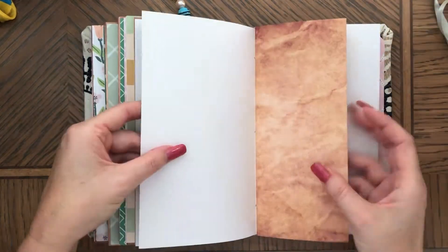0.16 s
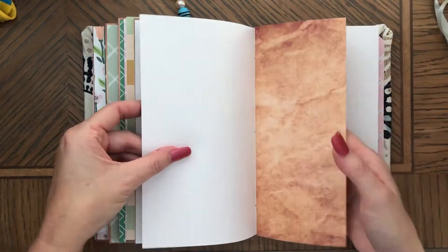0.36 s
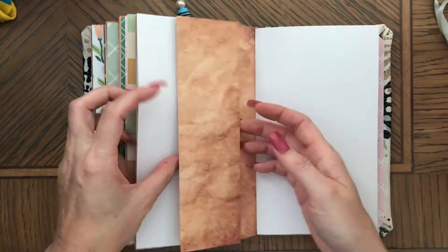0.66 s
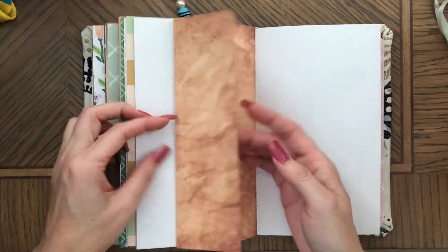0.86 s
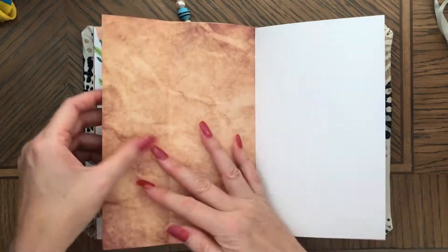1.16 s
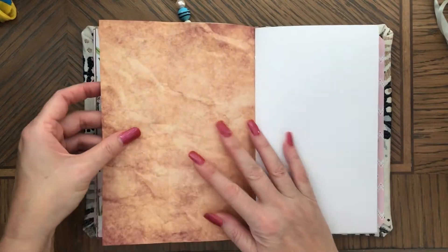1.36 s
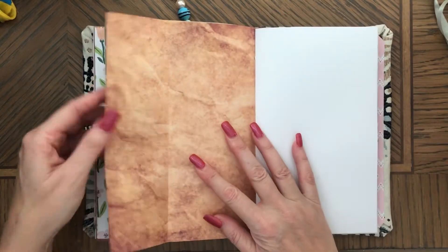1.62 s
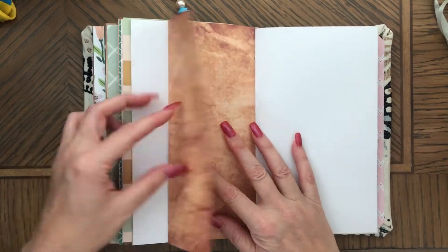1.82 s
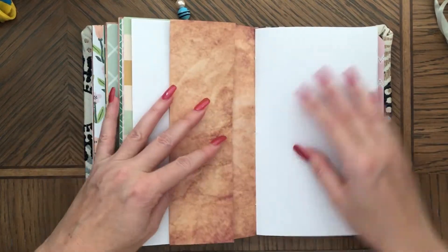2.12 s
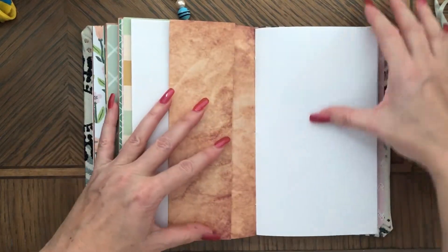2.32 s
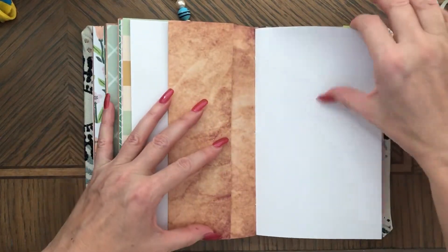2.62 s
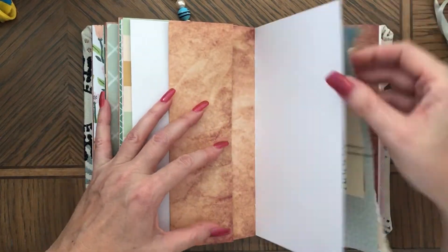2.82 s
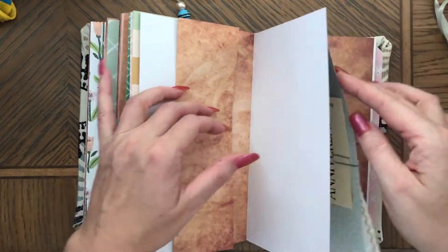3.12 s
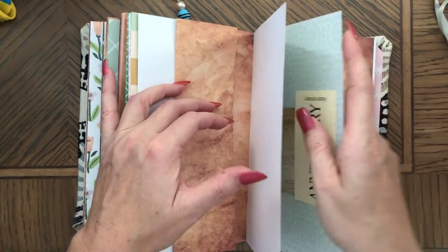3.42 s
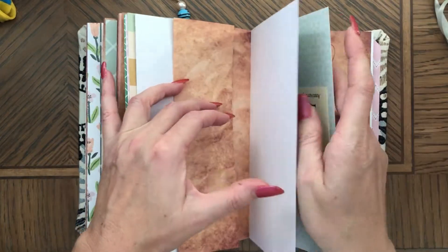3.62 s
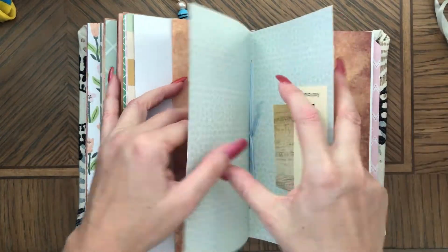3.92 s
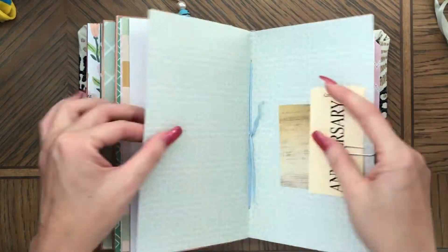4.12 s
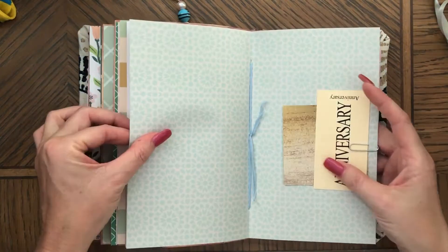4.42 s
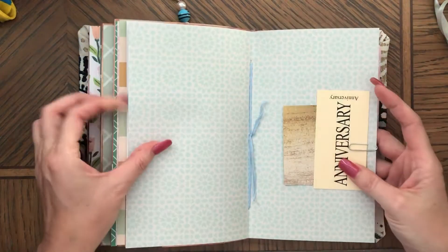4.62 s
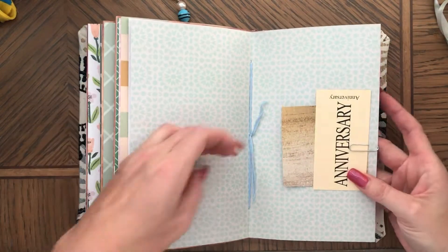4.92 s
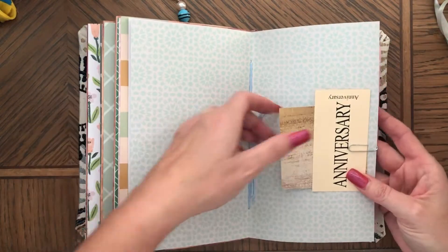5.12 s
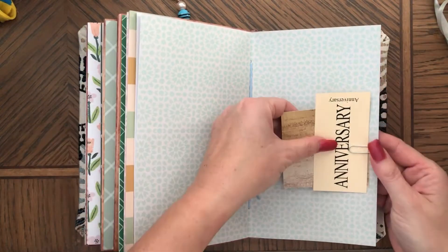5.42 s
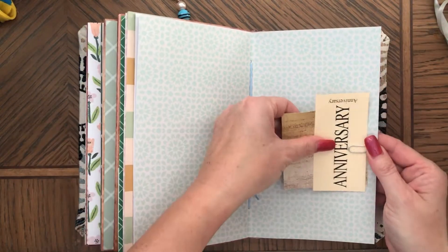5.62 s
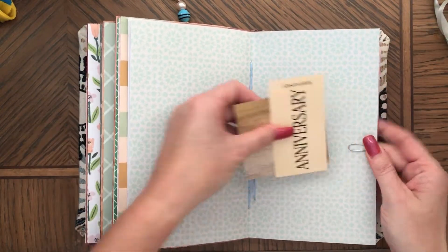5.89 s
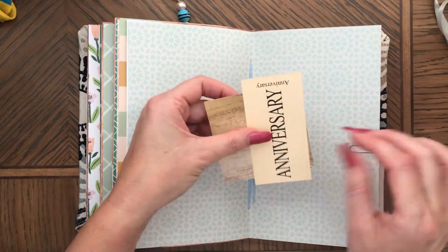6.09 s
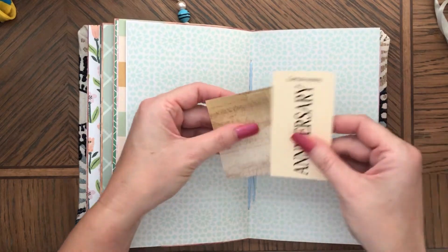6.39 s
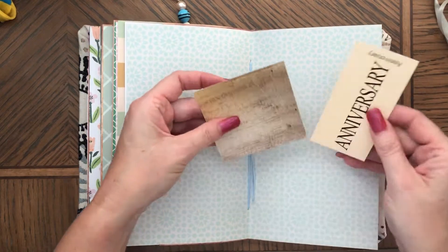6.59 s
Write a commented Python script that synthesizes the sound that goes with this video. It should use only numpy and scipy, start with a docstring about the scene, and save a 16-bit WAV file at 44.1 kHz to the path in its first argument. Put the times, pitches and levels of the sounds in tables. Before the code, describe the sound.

Close-up paper handling: grainy sliding, several hollow pops from bending sheets, and one hard crack as a stiff flap whips over. Then come softer smoothing strokes, crisp edge flicks, floppy page turns and crackly rustling, thinning into delicate rubbing of small card pieces. The place is a small, barely reverberant room with a faint wavering appliance hum; the same sound sits in the centre throughout.

```python
"""Small quiet room, wooden table: hands leaf through a handmade paper journal close to one microphone.
Sheets slide and skid with a grainy swish (coloured fibre slips); bent paper pops and slack sheets flop
(short waves of sinking pitch); edges flick (filtered noise bursts); a folded flap snaps open (noise blows
and ringing modes); a palm smooths the page (a noise sweep). Reflections, soft air noise and a low hum
surround them."""
import sys
import numpy as np
from scipy import signal
from scipy.fft import rfft, irfft
from scipy.io import wavfile
from scipy.ndimage import uniform_filter1d, map_coordinates

SR = 44100
rng = np.random.default_rng(int(sys.argv[2]) if len(sys.argv) > 2 else 0)


def wrap_up_sound(samples):
    """Save the sound to the file named by the first command line argument, as 16-bit audio."""
    columns = np.atleast_2d(samples).T
    # keep every value between -1 and 1, then stretch to whole-number steps
    tamed = np.clip(columns, -1, 1)
    steps = np.round(tamed * 32767).astype(np.int16)
    wavfile.write(sys.argv[1], SR, steps)


N = 297675
HIT_SAMPLES = 4096  # one short event


def undb(db):
    """Decibels to gain."""
    return 10 ** (np.asarray(db) / 20)


def unit(x):
    """Scale to an rms of one."""
    return x / np.sqrt(np.mean(x ** 2))


def colour(x, points):
    """Causal minimum-phase filter shaped by (Hz, dB) points; keeps the power of white noise."""
    hz, db = np.transpose(points)
    size = 4096
    bin_hz = np.arange(size // 2 + 1) * SR / size
    gain_db = np.interp(np.log(bin_hz + 1), np.log(hz), db)
    cepstrum = irfft(np.log(undb(gain_db)))[:size // 2]
    cepstrum[1:] *= 2
    response = irfft(np.exp(rfft(cepstrum, size)))
    return signal.fftconvolve(x, response / np.linalg.norm(response))[:len(x)]


def ring(x, hz, width_hz):
    """One resonance, gain 1 at its centre."""
    hz = min(hz, SR / 3)
    b, a = signal.iirpeak(hz, hz / min(width_hz, SR / 3), fs=SR)
    return signal.lfilter(b, a, x)


def walk(rate_hz):
    """Smooth random wander with an rms of one."""
    step = int(SR / rate_hz)
    held = np.repeat(rng.standard_normal(N // step + 1), step)
    return unit(uniform_filter1d(held, step)[:N])


def add(track, start_s, sound):
    """Mix a sound into a track at a time."""
    i = max(int(start_s * SR), 0)
    track[i:i + len(sound)] += sound[:N - i]


def sliding():
    """Moving paper rubs, crackles, hisses along its edge and shakes in broad, slow bends."""
    # Each row: frequency in Hz, relative level in dB.
    rub_colour = [(450, -13.5), (750, -5.5), (1100, 3.5), (1700, 1.5), (2400, 2.5), (3800, 2.5),
                  (5500, -8.5), (8000, -15), (12000, -43.5)]
    # Each row: frequency in Hz, relative level in dB.
    hiss_colour = [(2200, -35), (4000, -0.5), (6000, 0.5), (8000, -1), (11000, -4), (15500, -3)]
    # Each row: frequency in Hz, relative level in dB.
    flutter_colour = [(120, -18), (250, -2.5), (350, -0.5), (560, -1), (740, 2.5), (950, 1.5),
                      (1500, -23.5)]
    # Resonance of the sheet or card in hand, until the next row.
    # Each row: start in seconds, centre in Hz, width in Hz, gain in dB.
    sheet_modes = [(0, 1960, 900, 8.5), (0.501, 1260, 700, -11), (2.002, 2250, 381.5, 4),
                   (2.58, 830, 295, 2), (3.68, 1420, 399, -5.5), (5.081, 860, 232, 9.5),
                   (5.6, 1326, 406, -1.5), (5.74, 2260, 500, 4), (5.9, 1310, 594, 9), (6.27, 1700, 450, 5)]
    crease_db, crease_share = -6, 0.2  # crackle re rub; share of flutter re rub (dB) added to it
    stretch_s = 0.004  # rms lag of the rub: bending slides its resonances up and down
    grip_slow_db, grip_fast_db = 1.5, 1.24  # rms unevenness of the fingers' grip

    t = np.arange(N) / SR
    rub_db, hiss_db, flutter_db = strokes()
    fibres = slips(rate_hz=900, spread_db=1.5, smooth=1.0)
    sheet = colour(fibres, rub_colour)
    body = np.zeros(N)
    for start_s, hz, width_hz, db in sheet_modes:
        resonant = unit(sheet + undb(db) * ring(sheet, hz, width_hz))
        body = np.where(t >= start_s, resonant, body)
    body = map_coordinates(body, [(t + stretch_s * walk(7)) * SR], mode="mirror")
    body = flex(body, depth=0.48) * undb(rub_db)

    airy = fibres + 1.7 * rng.standard_normal(N)
    edge = flex(colour(airy, hiss_colour), depth=0.2) * undb(hiss_db)
    # a sheet that flexes crackles more than one that glides flat
    creases = crackle() * undb(rub_db + crease_db + crease_share * (flutter_db - rub_db))
    bends = colour(slips(rate_hz=200, spread_db=3.0, smooth=0.74), flutter_colour) * undb(flutter_db)
    grip_db = grip_slow_db * walk(50) + grip_fast_db * walk(250)
    return undb(grip_db) * (body + edge + creases + bends)


def strokes():
    """Levels of rub, hiss and flutter in dB; slides swell and glide, skids only brake, powers add."""
    # A hand pushes paper along, speeding up and stopping. Each row: start in seconds, length in seconds,
    # rub level in dB, edge hiss in dB re rub, sheet flutter in dB re rub.
    slide_table = [(0.0, 0.11, -47.5, -5, -17.5), (0.143, 0.037, -39.5, -7, -24), (0.16, 0.3, -51, -3, -9),
                   (0.458, 0.19, -52, -3, -3.5), (0.785, 0.068, -45, -8, -6), (0.886, 0.099, -55.5, 1, -3),
                   (1.028, 0.047, -52, -1.5, -0.5), (1.155, 0.16, -53.5, 3, -2),
                   (1.524, 0.098, -58, -7, -1), (1.829, 0.073, -49.5, -9, -2),
                   (1.921, 0.11, -48.5, -1.5, -12.5), (2.025, 0.041, -38.5, 1.5, -34),
                   (2.092, 0.026, -37.5, -0.5, -17.5), (2.251, 0.076, -51.5, -6.5, -11),
                   (2.602, 0.034, -49, -4.5, -14), (2.656, 0.19, -48.5, -5.5, -16),
                   (2.69, 0.036, -60.5, 15, -22), (2.79, 0.044, -55.5, 11, 1),
                   (2.894, 0.0057, -51, 9.5, -1), (2.964, 0.085, -48.5, -0.5, -11),
                   (3.064, 0.15, -52.5, -6, -2.5), (3.245, 0.14, -70.5, 10.5, -11),
                   (3.411, 0.055, -48.5, 2, -6.5), (3.478, 0.065, -51.5, -6, -23),
                   (3.522, 0.032, -48.5, -2, -9), (3.602, 0.017, -54.5, -5, -5.5),
                   (3.717, 0.092, -49.5, 0.5, -13.5), (3.921, 0.034, -51, 2.5, -22),
                   (3.989, 0.04, -47, -2.5, -15), (4.294, 0.16, -60, -10, -0.5),
                   (4.516, 0.097, -55.5, 3, -2.5), (5.025, 0.085, -73.5, 13, -1),
                   (5.316, 0.068, -59, -4.5, -25), (5.702, 0.13, -55, 1, -15),
                   (5.905, 0.066, -53.5, -1, -9), (6.306, 0.14, -51, 4, -49), (6.561, 0.22, -63.5, 6, -5)]
    # Paper lands at speed and skids to rest. Each row: start in seconds, length in seconds,
    # rub level in dB, edge hiss in dB re rub, sheet flutter in dB re rub.
    skid_table = [(0.873, 0.075, -42.5, -24, -2.5), (1.1, 0.28, -60, 1.5, -2), (1.17, 0.044, -48, -6, 3.5),
                  (1.753, 0.11, -52.5, 4, 0), (2.145, 0.26, -54.5, 5.5, -8), (2.427, 0.47, -65, -4, -2),
                  (3.334, 0.23, -57, -2.5, -7), (3.655, 0.18, -61, 3, 0.5), (3.81, 0.33, -52, -27, -5),
                  (4.066, 0.28, -53.5, -5, -7.5), (4.672, 0.21, -59, -4, -5), (4.803, 0.35, -56, 2, -8),
                  (5.1, 0.51, -51, -3, -7), (5.619, 0.59, -52, -6, -20), (6.093, 0.12, -62.5, -1, -16),
                  (6.227, 0.08, -63, -0.5, -13), (6.277, 0.068, -55.5, 4.5, 0.5)]
    rise_share = 0.9  # part of a slide's length spent speeding up
    ease_s = 0.022  # smoothing of a slide's start and stop
    stop_s, stop_share = 0.022, 0.84  # braking time: fixed part plus share of the length
    land_s = 0.0014  # time in which a sheet makes contact

    t = np.arange(N) / SR
    power = np.full((3, N), undb(-180))  # floor keeps the logarithm finite
    for start_s, length_s, db, hiss_db, flutter_db in slide_table:
        brake_s = stop_s + stop_share * length_s
        moving = motion(t - start_s, rise_share * length_s, length_s, brake_s)
        moving = uniform_filter1d(moving, int(ease_s * SR) + 1)
        power += np.outer(undb(db) * undb([0, hiss_db, flutter_db]), moving) ** 2
    for start_s, length_s, db, hiss_db, flutter_db in skid_table:
        moving = motion(t - start_s, land_s, 0, length_s)
        power += np.outer(undb(db) * undb([0, hiss_db, flutter_db]), moving) ** 2
    return 10 * np.log10(power)


def motion(t, rise_s, hold_s, brake_s):
    """Loudness of moving paper: it speeds up, glides until hold, then friction brakes it evenly to rest."""
    rise_power, skid_power = 0.28, 1.51  # loudness against rising and falling speed
    rising = np.clip(t / rise_s, 0, 1) ** rise_power
    braking = np.clip(1 - (t - hold_s) / brake_s, 0, 1) ** skid_power
    return rising * braking


def slips(rate_hz, spread_db, smooth):
    """Fibres catch and let go: clicks of uneven size over the blur of countless tiny ones."""
    sizes = undb(spread_db * np.minimum(rng.exponential(size=N), 4))
    clicks = (rng.random(N) < rate_hz / SR) * sizes * rng.choice([-1, 1], N)
    return unit(unit(clicks) + smooth * rng.standard_normal(N))


def flex(x, depth):
    """Narrow resonances come and go as the sheet bends."""
    shifting = sum(walk(22) * ring(x, hz, hz / 12) for hz in np.geomspace(700, 14000, num=30))
    return unit(x + depth * shifting)


def crackle():
    """Tiny creases give way at random, each with a short ping in one of six bands."""
    creases = np.zeros(N)
    for hz in np.geomspace(850, 5000, num=6):
        ping = ring(slips(rate_hz=50, spread_db=4.0, smooth=0), hz, 0.41 * hz)
        creases += ring(ping, hz, 0.64 * hz) / np.sqrt(hz)
    return unit(creases)


def palm():
    """A flat hand smooths the opened page: one fine, airy sweep."""
    start_s, length_s, level_db, centre_hz = 1.15, 0.19, -49, 12000
    progress = np.clip((np.arange(N) / SR - start_s) / length_s, 0, 1)
    air = unit(ring(rng.standard_normal(N), centre_hz, centre_hz / 2))
    return undb(level_db) * np.sin(np.pi * progress) * air


def pops():
    """A bent sheet buckles in a short push; bending waves carry its lows late, and the sheet shivers on."""
    # Each row: start in seconds, level in dB, pitch at the peak of the push in Hz.
    pop_table = [(0.2437, -20.5, 1790), (0.2893, -21, 1620), (0.338, -17.5, 1810), (0.4392, -16.5, 1734),
                 (0.4746, -29, 1830), (1.8366, -30, 1644), (1.88, -30, 1830), (1.9696, -24, 2270),
                 (2.762, -34.5, 1150), (2.8605, -30.5, 1470), (3.087, -33.5, 1020), (3.3389, -32, 1235),
                 (3.836, -30.5, 1400), (4.325, -33, 3060), (4.3512, -23, 2595), (4.3836, -39, 2180),
                 (4.4747, -25.5, 2490), (4.5093, -29, 3000), (5.1024, -29, 1110), (5.119, -31, 1560),
                 (5.2112, -38, 1340), (5.248, -30.5, 2340), (5.3017, -36.5, 1360), (5.3841, -41, 2020),
                 (5.616, -27.5, 1516), (5.8673, -28, 2240), (5.974, -37.5, 1040), (6.2785, -33, 1780)]
    push_cycles, push_sharpness = 0.66, 2.46  # cycles until the peak; abruptness of swell and decay
    lows_db, lows_decay_s = -25, 0.012  # late lows re the push
    shiver_db, shiver_decay_s = -12, 0.0036  # shiver re the push
    bend_s = 0.0098  # larger: pitch sinks more slowly

    out, t = np.zeros(N), np.arange(HIT_SAMPLES) / SR
    noises = rng.choice([-1., 1.], (len(pop_table), HIT_SAMPLES))
    for (start_s, db, hz), noise in zip(pop_table, noises):
        age = t * hz / push_cycles
        push = (age * np.exp(1 - age)) ** push_sharpness
        lows = undb(lows_db) * (1 - np.exp(-age)) * np.exp(-t / lows_decay_s)
        # travel time grows as the pitch falls
        pitch_hz = hz * ((bend_s + push_cycles / hz) / (bend_s + t)) ** 2
        wave = noise[0] * np.sin(2 * np.pi * np.cumsum(pitch_hz) / SR)  # random polarity
        rustle = noise * (1 - np.exp(-age)) * np.exp(-t / shiver_decay_s)
        shiver = colour(rustle, [(150, -10), (.4 * hz, 0), (1.3 * hz, -2), (3 * hz, -12), (15000, -21)])
        add(out, start_s, undb(db) * ((push + lows) * wave + undb(shiver_db) * shiver))
    return out


def flops():
    """A slack sheet bellies over: a soft, hollow wobble that swells, crinkles and sinks in pitch."""
    # Each row: start in seconds, level in dB, starting pitch in Hz.
    flop_table = [(1.004, -44.5, 680), (1.083, -40, 845), (1.28, -50, 530), (1.84, -41.5, 767),
                  (3.149, -41, 1053), (5.122, -45.5, 427)]
    swell_s, fall_oct_per_s = 0.0068, 38  # time until the peak; sinking of the pitch
    crinkle_db = -5.5  # gain of the unit-rms crinkle

    out, t = np.zeros(N), np.arange(HIT_SAMPLES) / SR
    swell = (t / swell_s * np.exp(1 - t / swell_s)) ** 2
    noises = rng.standard_normal((len(flop_table), HIT_SAMPLES))
    for (start_s, db, hz), noise in zip(flop_table, noises):
        pitch_hz = hz * 2 ** (-fall_oct_per_s * t)
        wobble = np.sin(2 * np.pi * np.cumsum(pitch_hz) / SR)
        crinkle = unit(ring(noise, hz, 2 * hz))
        add(out, start_s, undb(db) * swell * (wobble + undb(crinkle_db) * crinkle))
    return out


def flicks():
    """An edge or a nail flicks over paper: a quick run of slips that dies away."""
    # Each row: start in seconds, peak in dB, centre in Hz, decay in seconds.
    flick_table = [(0.0445, -32.5, 3280, 0.0035), (0.1548, -34, 2410, 0.0067), (0.18, -44, 2240, 0.012),
                   (0.249, -31, 2500, 0.0091), (0.497, -30.5, 1350, 0.015), (0.6287, -30, 5100, 0.0021),
                   (0.7018, -34, 5500, 0.0038), (0.7916, -34, 1470, 0.0042), (0.809, -27.5, 4980, 0.003),
                   (0.9423, -37.5, 2640, 0.009), (1.1699, -34, 2400, 0.0007), (1.178, -30.5, 2980, 0.0014),
                   (1.242, -32.5, 2560, 0.0042), (1.353, -38, 4050, 0.0019), (1.45, -39, 1490, 0.002),
                   (1.631, -42.5, 6900, 0.005), (1.7306, -44.5, 2670, 0.0094), (1.756, -40.5, 4740, 0.0074),
                   (1.873, -31.5, 2730, 0.0021), (1.8828, -27, 3860, 0.002), (2.142, -28, 4050, 0.0098),
                   (2.4344, -48, 6000, 0.0029), (3.2085, -25.5, 3030, 0.0024), (3.331, -35.5, 4200, 0.0023),
                   (3.6552, -28, 3270, 0.0023), (4.0692, -37, 1740, 0.0046), (4.2386, -40.5, 1270, 0.012),
                   (4.431, -40, 2000, 0.0052), (4.6144, -34, 4930, 0.0077), (4.803, -27, 5330, 0.0017),
                   (5.102, -29, 2190, 0.0014), (5.2995, -38.5, 2420, 0.005), (5.6153, -35.5, 2600, 0.0015),
                   (5.77, -36.5, 2220, 0.003), (6.2798, -36.5, 3400, 0.00097), (6.507, -35.5, 2340, 0.01),
                   (6.637, -42, 1980, 0.0035), (6.73, -36, 3020, 0.021)]
    out, t = np.zeros(N), np.arange(HIT_SAMPLES) / SR
    noises = rng.choice([-1., 1.], (len(flick_table), HIT_SAMPLES))
    for (start_s, db, hz, decay_s), noise in zip(flick_table, noises):
        burst = ring(noise * np.exp(-t / max(decay_s, .0005)), hz, 0.92 * hz)
        add(out, start_s, undb(db) * burst / abs(burst).max())
    return out


def snap():
    """The flap springs free, whips over and slaps down: blows start with a crack; the first rings it."""
    # Each row: start in seconds, level in dB, decay in seconds, crack in dB re level.
    blow_table = [(0.829, -18, 0.0105, -1.5), (0.8351, -18, 0.0065, -29), (0.85, -20, 0.0065, -4),
                  (0.862, -29.5, 0.0064, -23.5)]
    # Each row: frequency in Hz, relative level in dB.
    blow_colour = [(60, -24.5), (100, -23), (300, -24.5), (400, -12), (560, -18.5), (1020, -10.5),
                   (1730, -11.5), (2750, -7), (6300, -16.5), (7700, -22), (15500, -43.5)]
    # Modes of the stiff paper. Each row: frequency in Hz, level in dB.
    flap_modes = [(943, -37), (1112, -32), (1871, -27), (2187, -40), (2527, -50), (2754, -35.5),
                  (2972, -33), (4782, -43.5), (6032, -44.5)]
    crack_decay_s, mode_rise_s, mode_decay_s = 0.00084, 0.0041, 0.021

    blows, cracks, t = np.zeros(N), np.zeros(N), np.arange(HIT_SAMPLES) / SR
    noises = rng.choice([-1., 1.], (len(blow_table), HIT_SAMPLES))
    for (start_s, db, decay_s, crack_db), noise in zip(blow_table, noises):
        add(blows, start_s, undb(db) * noise * np.exp(-t / decay_s))
        add(cracks, start_s, undb(db + crack_db) * noise * np.exp(-t / crack_decay_s))
    ringing = sum(undb(db) * np.sin(2 * np.pi * (hz * t + rng.random())) for hz, db in flap_modes)
    envelope = (1 - np.exp(-t / mode_rise_s)) * np.exp(-t / mode_decay_s)
    add(cracks, blow_table[0][0], ringing * envelope)
    return colour(blows, blow_colour) + cracks


def reflections(x, table_db, walls_db, t60_s):
    """Table and book scatter the sound within milliseconds; the walls return a faint, duller tail."""
    t = np.arange(SR // 2) / SR
    near, far = rng.standard_normal((2, len(t)))
    near = near * (t > .002) * np.exp(-t / 0.0024)
    near = colour(near, [(200, 0.5), (3000, 0.94), (15000, 1.9)])
    far = far * (t > .008) * np.exp(-np.log(1000) * t / t60_s)
    far = colour(far, [(200, 3.5), (3000, -5.0), (15000, -15.5)])
    response = undb(table_db) * near / np.linalg.norm(near) + undb(walls_db) * far / np.linalg.norm(far)
    return signal.fftconvolve(x, response)[:N]


def room_tone():
    """Soft air noise with the wavering low hum of an appliance."""
    # Each row: frequency in Hz, relative level in dB per Hz.
    air_colour = [(25, -7.5), (60, -5.5), (100, -0.5), (260, -10), (550, -14.5), (850, -16), (1700, -24.5),
                  (3400, -27), (15500, -38.5)]
    air_db, hum_hz, hum_db = -63, 118.6, -68
    air = undb(air_db) * colour(rng.standard_normal(N), air_colour)
    phase = 2 * np.pi * np.cumsum(hum_hz + 2 * walk(14)) / SR
    hum = unit(np.sin(phase) * undb(2.2 * walk(14)))
    return air + undb(hum_db) * hum


def scene():
    """All the paper sounds in the room, the same in both channels."""
    paper = sliding() + palm() + pops() + flops() + flicks() + snap()
    mono = paper + reflections(paper, table_db=-12, walls_db=-26.5, t60_s=0.18) + room_tone()
    return np.array([mono, mono])


def record(dry):
    """The microphone sheds the deepest bass and cuts the top."""
    low_cut = signal.butter(4, 42, "high", fs=SR, output="sos")
    top_cut = signal.ellip(10, .2, 70, 15900, fs=SR, output="sos")
    return signal.sosfilt(top_cut, signal.sosfilt(low_cut, dry))


dry = scene()
out = record(dry)
wrap_up_sound(out)
```